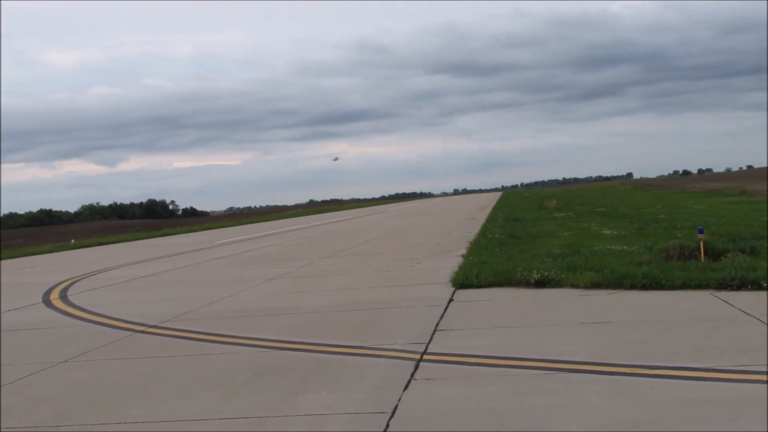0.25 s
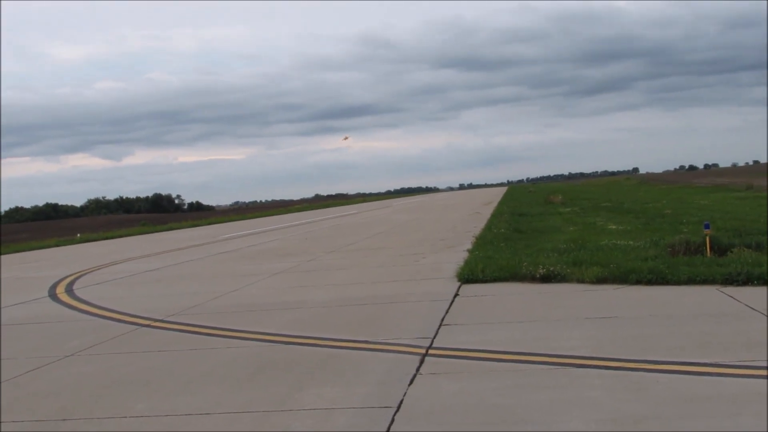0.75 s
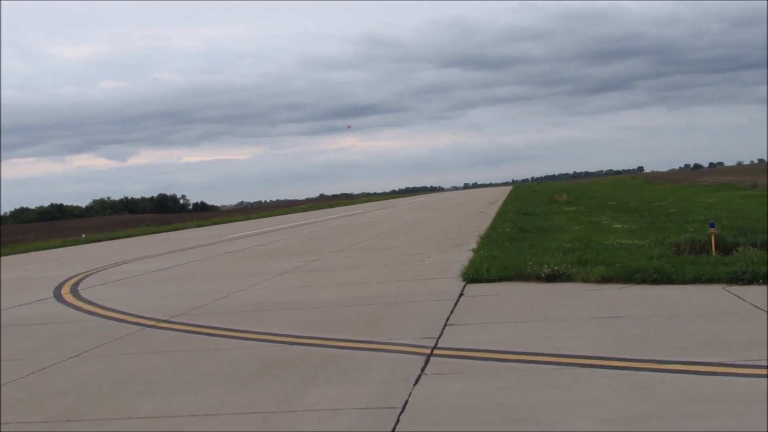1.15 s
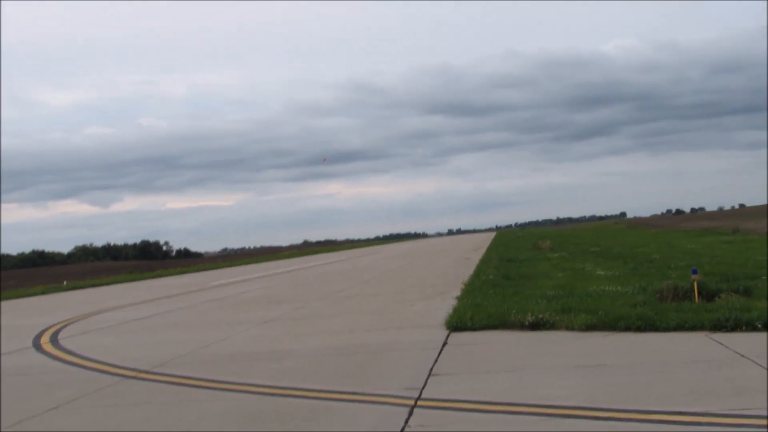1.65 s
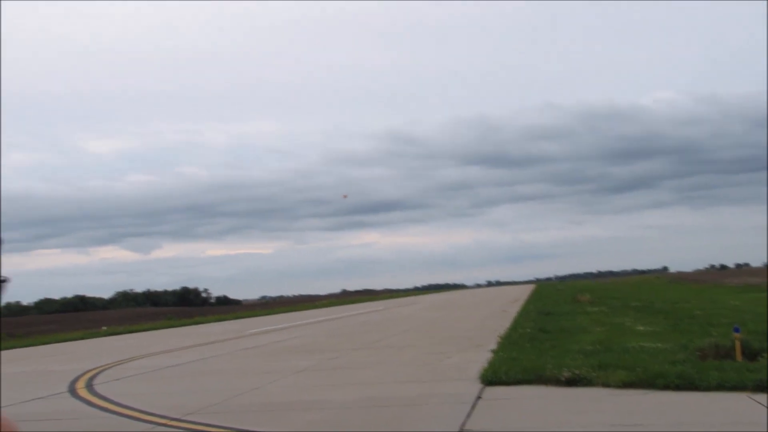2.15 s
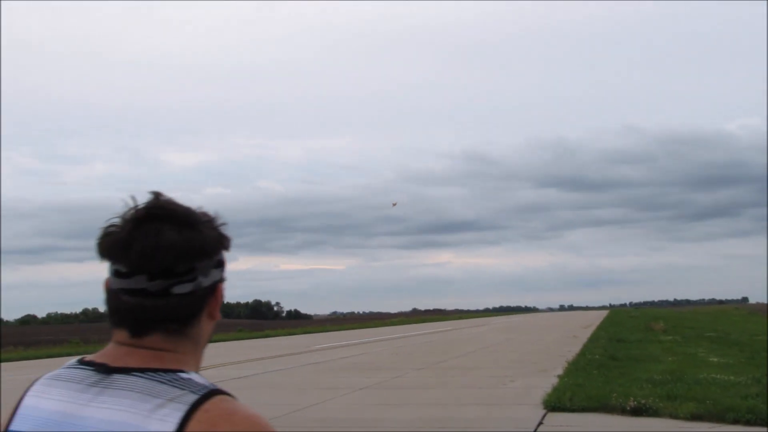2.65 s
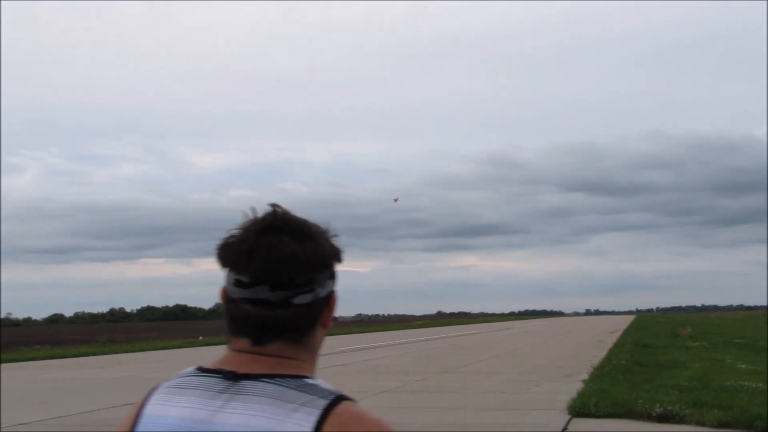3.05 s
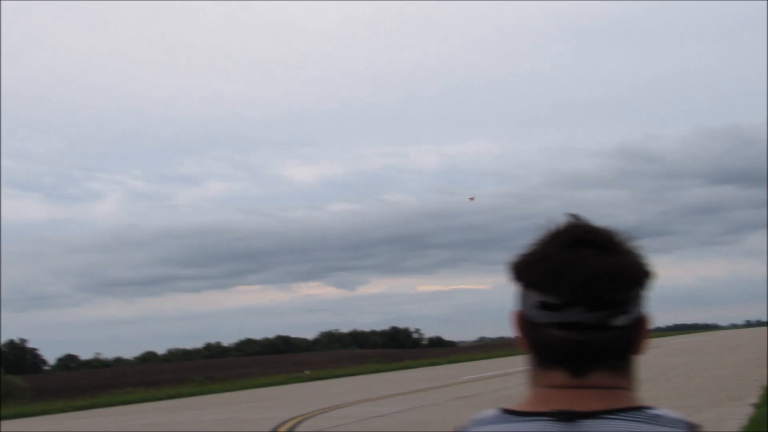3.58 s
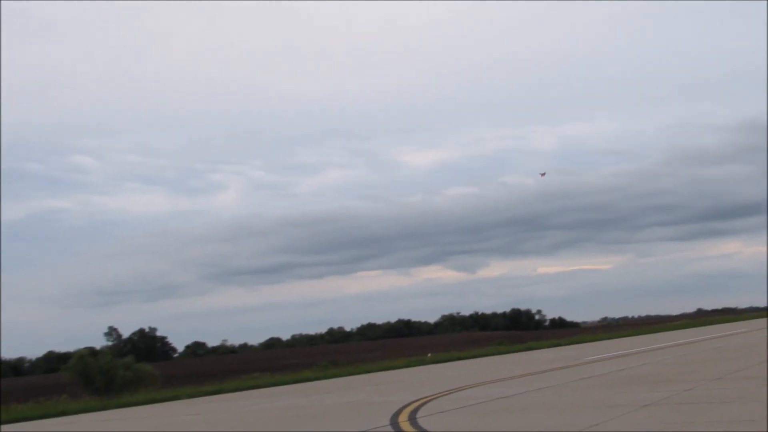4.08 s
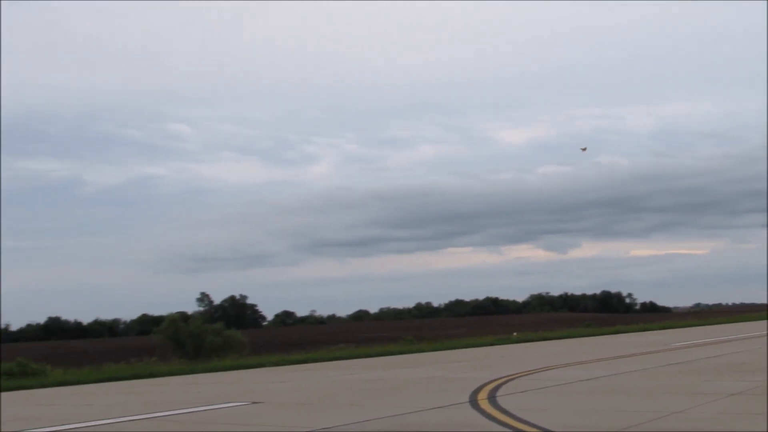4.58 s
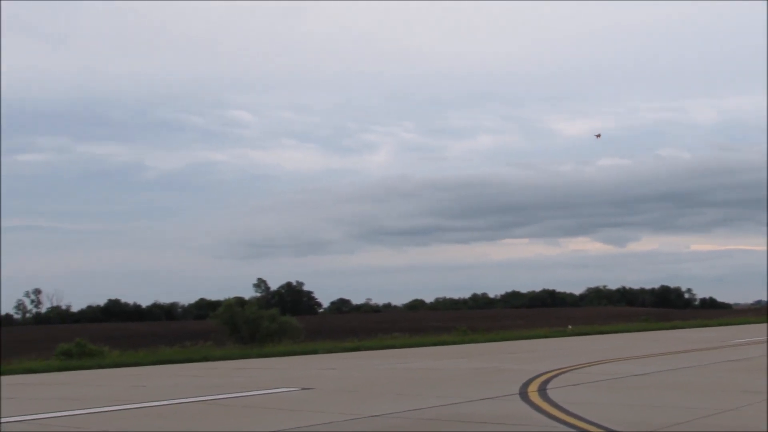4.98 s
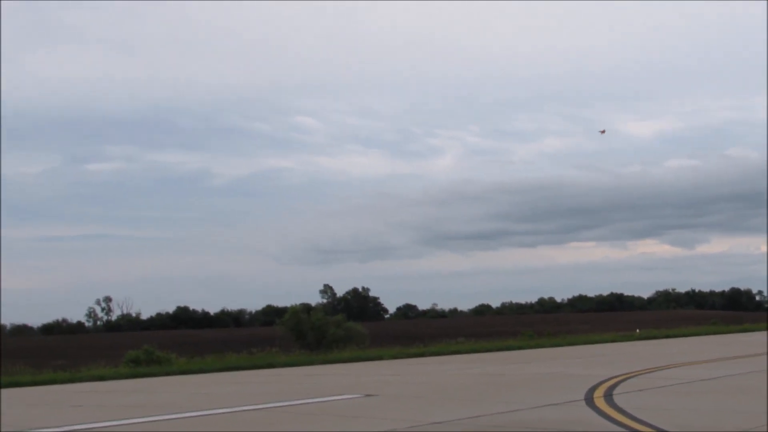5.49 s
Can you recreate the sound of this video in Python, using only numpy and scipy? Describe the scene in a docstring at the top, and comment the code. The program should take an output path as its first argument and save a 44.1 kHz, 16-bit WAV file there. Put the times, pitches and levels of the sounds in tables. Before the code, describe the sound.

Outdoors on an open airfield, wind hits an unprotected stereo microphone from the start, making low rumble and irregular thuds that push left and right opposite ways. Beneath it a small model jet gives a steady, central, breathy roar, brightest in the first half second, with a barely audible, very high whine that drops slightly around 0.4 s and fades by about 3 s. Thumps crowd together from 0.5 to 0.8 s and hit hardest at 1.2-1.7 s, with the sound briefly ducking. Wind eases around 1.8-2.8 s, exposing the roar, hollow and shifting as the jet climbs. Tiny cloth and sole brushes pass at 2.3-3.1 s. Heavy buffets return at 3.4-4.4 s, then crackling, snapping gusts at 4.8-5.1 s, with a soft scuff near 4.9 s. The roar swells and dips in uneven waves, losing its hiss, until a large thump at 5.6 s just before the end.

```python
"""Wind thuds on the microphones come first, over the roar of a model jet climbing from a runway by open fields.
Wind pushes the left and right ports opposite ways: small eddies make filtered noise, big ones thump and snap.
The roar is noise heard directly and off the ground, so notches drift down as it climbs; a thin sine whine falls.
Soles and cloth brush past as short bursts of noise. A limiter ducks everything when the hardest thumps overload."""
import sys
import numpy as np
from scipy import signal
from scipy.fft import rfft, irfft, next_fast_len
from scipy.io import wavfile
from scipy.ndimage import uniform_filter1d, minimum_filter1d

SR = 44100
rng = np.random.default_rng(int(sys.argv[2]) if len(sys.argv) > 2 else 0)


def log_audio(samples):
    """Write samples as a 16-bit WAV file to the path given in sys.argv[1]."""
    # one column per channel
    frames = np.atleast_2d(samples).T
    # limit to full scale, then quantise
    limited = np.clip(frames, -1, 1)
    pcm = np.round(limited * 32767).astype(np.int16)
    wavfile.write(sys.argv[1], SR, pcm)


N = 252693
T = np.arange(N) / SR
FRAME = 1024  # samples in each short spectrum
OPPOSITE = np.array([[1], [-1]])  # left and right pushed opposite ways

# Shoes and clothes brushing:
# (time [s], length either side [s], level [dB], centre [Hz], width either side [Hz])
BRUSHES = [(2.26, .004, -60, 10200, 4500), (2.438, .015, -66, 5700, 900), (2.454, 0.0065, -51, 5050, 500),
           (2.488, 0.064, -61, 7900, 4000), (2.681, 0.1, -60, 8500, 2400), (2.872, 0.03, -60, 7750, 750),
           (2.922, .07, -71, 10000, 4200), (2.924, .02, -56.5, 5200, 1300), (2.96, .015, -58.5, 5200, 1500),
           (3.035, .03, -59, 7750, 1100), (3.139, 0.12, -58.5, 7350, 3740), (3.85, .05, -73, 6000, 3500),
           (4.915, 0.075, -44, 2400, 1560), (4.938, 0.06, -53.5, 4600, 3400),
           (4.96, .03, -58.5, 6600, 3500), (5.426, 0.052, -62, 7160, 3200), (5.578, .027, -60, 6030, 3520)]
# Gusts at the ports, before small random surges:
# (start [s], holding time [s], level [dB], tilt toward small eddies [dB])
WIND_GUSTS = [(0, 0.013, -16.5, 2.5), (0.1, 0.12, -19.5, -2), (0.26, .05, -26, -6), (0.358, 0.053, -16, -2),
              (0.462, 0.079, -14, 3.5), (0.593, 0.048, -15.5, -2.5), (0.67, 0.084, -17.5, 0.5),
              (0.777, 0.18, -18, -2), (1.022, 0.039, -15.5, -2.5), (1.175, 0.06, -13, -1),
              (1.245, 0.19, -10.5, 2.5), (1.484, .05, -12.5, -0.5), (1.569, 0.046, -9, -3.5),
              (1.674, 0.03, -8, -2), (1.8, 0.038, -19.5, -6), (1.888, 0.042, -18.5, 0),
              (1.998, 0.052, -18.5, -9.5), (2.082, 0.12, -20, -2), (2.247, 0.039, -18, -1),
              (2.329, 0.066, -18.5, -0.5), (2.428, 0.13, -18, -3.5), (2.599, 0.032, -20, 4),
              (2.668, 0.024, -19.5, 0), (2.751, 0.033, -20, 0.5), (2.849, 0.01, -12.5, 1.5),
              (2.927, 0.018, -13.5, 1), (3.042, 0.031, -20, 2.5), (3.111, 0.023, -20, 2),
              (3.178, 0.022, -18.5, 1), (3.355, 0.013, -28, 5), (3.429, 0.076, -13.5, 1.5),
              (3.537, 0.069, -17, -5), (3.601, 0.041, -8.5, 0), (3.673, 0.14, -14, 0),
              (3.804, 0.12, -13, 3.5), (3.935, 0.18, -11.5, 2), (4.14, 0.06, -14, 1.5),
              (4.225, 0.1, -16.5, 1), (4.443, 0.028, -13.5, 4), (4.504, 0.087, -25.5, -4.5),
              (4.666, 0.017, -16, 0), (4.74, 0.065, -16.5, 0), (4.827, 0.056, -8.5, 9),
              (4.937, 0.063, -10.5, 8), (5.027, 0.068, -13.5, 4), (5.154, 0.08, -23, -6.5),
              (5.264, 0.068, -11.5, 4), (5.338, 0.024, -17, 3), (5.414, 0.026, -16, 6),
              (5.517, 0.044, -13, 5.5), (5.586, 0.028, -9, 1.5), (5.644, 0.095, -19.5, 2)]
# Wind rumble spectrum: (frequency [Hz], relative level per Hz [dB])
WIND_SPECTRUM = [(15, -9.5), (30, -28.5), (55, -2.5), (110, -0.5), (170, -1.5), (300, -8), (450, -17),
                 (560, -23), (690, -46), (850, -35), (1100, -52.5), (1600, -63), (3000, -100),
                 (12000, -110)]
# Big single eddies; the common and snap levels are trimmed in buffets():
# (time [s], peak [dB], pitch [Hz], spread [cycles], common part relative to the peak [dB],
#  snap level [dB], common share of the snap [0-1])
EDDY_THUMPS = [(.471, -4.5, 163, 0.4, -14, -48, .3), (0.494, -3.5, 80, .35, -16, -46, .2),
               (.509, -7, 113, 0.41, -14, -50, .3), (.534, 0.5, 312, 0.39, -13.5, -31, .2),
               (.588, -1.5, 163, 0.24, -16.5, -42, .3), (0.6, -8.5, 109, 0.47, -9, -50, .3),
               (.696, -3, 238, 0.33, -17.5, -38, .3), (0.713, -7.5, 150, 0.85, -14, -50, .3),
               (.813, -2, 216, 0.3, -19, -31, 0.5), (1.165, -3, 104, 0.21, -20, -50, .3),
               (1.205, -0.5, 123, 0.33, -15.5, -44, .25), (1.218, 0.5, 238, 0.33, -13, -36, .3),
               (1.241, 6, 214, 0.47, -15, -28, .4), (1.299, 0, 117, .4, -14.5, -50, .3),
               (1.318, 4.5, 216, 0.38, -13, -42, .3), (1.428, 0, 177, 0.47, -14.5, -48, .3),
               (1.581, -1, 147, 0.33, -21, -50, .3), (1.595, 0, 148, 0.39, -15, -50, .3),
               (1.612, -3, 288, 0.53, -13, -35, .3), (1.68, -3.5, 109, 0.27, -11.5, -50, .3),
               (1.698, -1, 226, 0.43, -12.5, -37, 0.3), (2.544, 0.5, 180, 0.25, -15.5, -30, .45),
               (2.762, -6.5, 159, 0.43, -17, -50, .3), (2.943, -4, 217, 0.28, -15, -38, .1),
               (3.041, -5, 124, 0.33, -14, -52, .3), (3.093, -2.5, 166, 0.39, -16.5, -48, .3),
               (3.451, -7, 135, 0.64, -15.5, -45, 0.2), (3.473, -4, 216, 0.42, -12.5, -36, .6),
               (3.486, -8.5, 164, 1.15, -10.5, -49.5, .3), (3.502, -6, 123, 0.38, -12.5, -50, .3),
               (3.617, -4, 216, 0.46, -12, -46, .3), (3.631, 1, 136, 0.38, -21, -50, .3),
               (3.643, 5.5, 261, 0.34, -16, -38, .3), (3.875, 5.5, 197, .7, -17.5, -30, .2),
               (3.937, 1, 178, 0.44, -19, -50, .3), (3.977, -2.5, 260, 0.27, -13.5, -26, 0.8),
               (4.071, -1, 134, 0.46, -14, -50, .3), (4.087, -3.5, 193, 0.34, -11, -50, 0.4),
               (4.232, -1.5, 308, 0.47, -15, -40, 0.3), (4.285, -1, 178, 0.42, -12.5, -53, .37),
               (4.352, 0, 227, 0.35, -13, -32, .5), (4.491, -4, 170, .35, -15.5, -50, .3),
               (4.676, -5, 84, 0.26, -16.5, -52, 0.4), (4.821, 3.5, 165, 0.52, -14, -21.5, 0.7),
               (4.958, 4.5, 220, 0.28, -16, -25.5, 0.4), (4.967, -1, 220, 0.3, -11, -44, .3),
               (5.066, 0.5, 238, 0.42, -16.5, -42, .3), (5.28, -1.5, 320, 0.36, -16, -47, .3),
               (5.307, -2, 300, 0.33, -16, -28, .6), (5.528, -5, 218, 0.61, -8.5, -27, 0.44),
               (5.536, -3.5, 164, .35, -13.5, -35, .3), (5.58, 6.5, 131, 0.35, -20, -20, 0.95),
               (5.613, 1.5, 164, 0.56, -16, -50, .3)]
# Compressor whine, fading with distance: (time [s], level [dB])
WHINE_LEVEL = [(0, -76), (.45, -72), (.75, -83), (1.25, -74), (1.85, -86), (2.9, -89), (3.3, -90),
               (4.4, -120)]
# The jet's loudness by band; the last three are relative to the roar, and bass is trimmed in exhaust():
# (time [s], roar [dB], bass [dB], rush [dB], hiss [dB])
JET_LEVELS = [(0, -37, -7.5, -7.5, -7.5), (.55, -37, -11.5, -8, -14), (.66, -40, -9, -7.5, -14.5),
              (.9, -41.5, -7.5, -7.5, -14), (1.17, -39.5, -7, -8.5, -12.5), (1.32, -42, -3, -13, -13),
              (1.55, -43.5, -3.5, -5.5, -11.5), (1.81, -46.5, -1, -10.5, -12),
              (2.31, -47.5, 0.5, -6.5, -10), (2.51, -43.5, -4, -5.5, -13), (2.71, -48, -3, -5, -10.5),
              (3.12, -43.5, -5, -8.5, -18.5), (3.32, -43, -3, -5.5, -19.5), (3.7, -37, -9, -12.5, -22),
              (3.82, -42, -7, -9, -14), (4.02, -44.5, -4, -8, -18.5), (4.22, -41.5, -10.5, -3, -15.5),
              (4.52, -40.5, -12.5, -4, -19), (4.72, -44, -10.5, -4.5, -24), (4.92, -37, -9, -10, -23.5),
              (5.03, -41, -14, -10, -19.5), (5.45, -39.5, -16.5, -8.5, -27.5),
              (5.73, -42.5, -15, -11.5, -27)]
# Exhaust noise spectrum: (frequency [Hz], relative level per Hz [dB])
EXHAUST_SPECTRUM = [(60, 4.5), (250, 7), (500, 4), (620, 1), (690, -13), (770, 1), (850, -2), (1050, 2),
                    (1270, 4.5), (1520, -2.5), (1740, 4), (2000, 1), (2450, -4), (3050, -2), (3480, -14),
                    (4100, -8), (4550, -13.5), (5600, -11), (9200, -15), (10800, -22), (11800, -31),
                    (13400, -39), (15000, -54)]
# The bounce off the ground: (time [s], lag [ms], strength before blurring [0-1])
GROUND_BOUNCE = [(0, 0.67, .3), (.45, 0.72, 0.4), (.75, 0.81, 0.75), (1.1, 0.923, 0.6), (1.5, 1.09, 0.22),
                 (1.9, 1.13, 0.44), (2.3, 1.2, 0.37), (2.5, 1.25, 0.37), (3.1, 1.304, 0.38),
                 (3.7, 1.45, 0.56), (4.1, 1.4, 0.37), (4.35, 1.37, 0.41), (4.68, 1.39, 0.57),
                 (4.85, 1.43, 0.55), (5.2, 1.51, 0.21), (5.73, 1.65, 0.16)]
# Ridges and hollows in the roar as the jet turns, before they waver:
# (start [s], end [s], from [Hz], to [Hz], width either side [Hz], height [dB])
ROAR_RIDGES = [(1.327, 2.4, 2650, 2300, 200, 4.5), (1.2, 1.86, 2340, 2500, 180, -12),
               (1.26, 2.33, 5300, 5800, 350, 4.5), (1.5, 2.68, 920, 910, 220, 5),
               (2, 3.3, 1620, 1510, 340, 6), (2.78, 3.65, 800, 730, 149, 6),
               (2.977, 4.23, 1320, 1400, 250, 5.5), (3.15, 3.5, 2070, 2100, 230, 2),
               (3.4, 3.95, 5300, 4300, 330, 5), (3.5, 4.77, 2230, 2280, 170, 7),
               (4.5, 4.96, 2080, 2030, 230, 7), (4.5, 5.8, 3500, 3520, 330, -6),
               (4, 4.95, 3300, 3040, 380, 7), (4, 4.67, 990, 1100, 260, -3),
               (5, 6.05, 2050, 1980, 410, 6.5), (-0.5, 0.19, 5550, 5400, 730, 4.5),
               (0, 0.36, 14000, 12000, 2600, 8), (1.6, 2.3, 1840, 1550, 260, -2),
               (1.9, 2.7, 4340, 4300, 310, -6.5)]
# The bands of bass, roar, rush and hiss: (from [Hz], to [Hz])
JET_BANDS = [(600, 950), (950, 2200), (2200, 3400), (4500, 10000)]


def undb(db):
    """Turn decibels into gain."""
    return 10 ** (np.asarray(db) / 20)


def curves(table, at=T):
    """Join each column of a table by straight lines in time."""
    s, *columns = np.transpose(table)
    return [np.interp(at, s, column) for column in columns]


def colour(points, hz):
    """Read a spectrum's level in dB at the given frequencies."""
    f, db = np.transpose(points)
    return np.interp(np.log(hz + 1), np.log(f), db)


def unit(x):
    """Scale to rms 1."""
    return x / np.sqrt(np.mean(x ** 2))


def filtered(x, points):
    """Pass a sound through a spectrum."""
    size = next_fast_len(N + 4096)
    hz = np.arange(size // 2 + 1) * SR / size
    return irfft(rfft(x, size) * undb(colour(points, hz)), size)[:N]


def walk(rate):
    """Wander between random levels, with rate new ones a second; rms 1."""
    hold = max(int(SR / rate), 2)
    steps = np.repeat(rng.standard_normal(N // hold + 1), hold)[:N]
    return unit(uniform_filter1d(steps, hold))


def noise_frames():
    """Cut white noise into short spectra: frequencies, times, frames."""
    f, t, z = signal.stft(rng.standard_normal(N), SR, nperseg=FRAME)
    return f[:, None], t, z


def from_frames(z):
    """Join short spectra into a sound."""
    return signal.istft(z, SR, nperseg=FRAME)[1][:N]


def scuffs(grain_db=2.5, side_db=-6):
    """Soles and cloth rub in short gritty brushes, each a swell of noise in one band."""
    out, grain = np.zeros((2, N)), grain_db * walk(320)
    for s, length, db, hz, width in BRUSHES:
        near = np.abs(T - s) < .3
        size = near.sum()
        band = np.exp(-2 * ((np.fft.rfftfreq(size, 1 / SR) - hz) / width) ** 2)
        noise = rng.standard_normal((2, SR))
        mid, side = unit(irfft(rfft(noise, size) * band, size))
        swell = np.exp(-2 * ((T[near] - s) / length) ** 2) * undb(db + grain[near])
        out[:, near] += swell * (mid + undb(side_db) * side * OPPOSITE)
    return out


def gusts(attack_s=0.0086, release_s=0.018, breeze_db=-30, breeze_tilt_db=-8):
    """Gusts rise, hold and die away over a steady breeze; gives the wind's level and tilt in dB."""
    power = np.full(N, undb(breeze_db) ** 2)
    tilted = power * breeze_tilt_db
    for start, length, db, tilt in WIND_GUSTS:
        rise = np.maximum(start - T, 0) / attack_s
        fall = np.maximum(T - start - length, 0) / release_s
        gust = (undb(db) * np.exp(-rise - fall)) ** 2
        power, tilted = power + gust, tilted + gust * tilt
    # the stronger a gust, the more its tilt counts
    return 10 * np.log10(power), tilted / power


def turbulence(db, tilt, flicker_db, lift_db, tilt_scale=0.99, crackle_db=3.5, follow_db=3):
    """Eddies press on a port: stronger wind brings more small ones, and the smallest come in bursts."""
    flicker = 1.95 * np.tanh(walk(55) / 1.62)
    noise = filtered(rng.standard_normal(N), WIND_SPECTRUM)
    # split the rumble from the largest, slowest eddies to the smallest
    lows = [signal.sosfiltfilt(signal.butter(3, hz, fs=SR, output="sos"), noise) for hz in (110, 280, 680)]
    deep, body, flap, crackle = np.diff([0 * noise, *lows, noise], axis=0)
    burst_db = crackle_db * 1.5 * np.tanh(walk(100) / 1.4) + follow_db * flicker
    burst = undb(burst_db + tilt + 0.87 * (db - db.max()))
    deep = deep * undb(-tilt_scale * tilt)
    flap = flap * undb(lift_db + tilt_scale * tilt + 3.3 * flicker)
    air = deep + body + flap + crackle * unit(burst)
    # even out the loudness, so that the wind level alone shapes it
    air = air / np.sqrt(uniform_filter1d(air ** 2, int(0.0295 * SR)) + 1e-18)
    return unit(air * undb(flicker_db * flicker)) * undb(db)


def buffets(common_db=0.0, snap_db=-0.5, snap_attack_s=0.00061, snap_release_s=0.0047):
    """Each big eddy gives a brief swing of pressure with a papery snap."""
    out = np.zeros((2, N))
    snap_spectrum = [(500, 3.0), (850, -1.0), (1250, -8.5), (2000, -30), (5000, -43), (12000, -79)]
    snap = unit(filtered(rng.standard_normal(N), snap_spectrum))
    chances = rng.random((len(EDDY_THUMPS), 2))
    for (s, push, hz, cycles, common, snap_level, share), (lead, sign) in zip(EDDY_THUMPS, chances):
        near = np.abs(T - s) < .04
        since = T[near] - s
        age = since * hz  # in cycles
        swell = np.exp(-.5 * (age / cycles) ** 2)
        # either port may be the one pushed in
        swing = np.sign(sign - .5) * undb(push) * swell * np.cos(2 * np.pi * age)
        out[:, near] += swing * OPPOSITE
        out[:, near] += undb(push + common + common_db) * swell * np.sin(2 * np.pi * age + lead)
        crack = np.exp(-.5 * (since / np.where(since < 0, snap_attack_s, snap_release_s)) ** 2)
        out[:, near] += undb(snap_level + snap_db) * crack * snap[near] * (share + OPPOSITE)
    return out


def wind(push_db=0.5, common_db=-13.5, surge_db=0.9, lean=0.062):
    """Close ports turn wind into opposite swings left and right, with a small common part."""
    level, tilt = gusts()
    level = level + surge_db * walk(23)
    push = turbulence(level + push_db, tilt, flicker_db=1.0, lift_db=-1.5)
    common = turbulence(level + common_db, tilt, flicker_db=2.0, lift_db=1.5)
    # the right port swings slightly harder
    ports = push * np.array([[1 - lean], [-1 - lean]]) + common
    # a big eddy briefly displaces the small ones
    for s, _, hz, *_ in EDDY_THUMPS:
        near = np.abs(T - s) < .04
        ports[:, near] *= 1 - np.exp(-((T[near] - s) * hz) ** 2)
    return ports + buffets()


def whine(near_hz=15060, away_hz=13700, drop_at_s=.38, drop_s=.12, waver_hz=35, near_waver_hz=50):
    """The compressor's blade tone sinks as the jet speeds away, roughened by the air."""
    away = .5 + .5 * np.tanh(.5 * (T - drop_at_s) / drop_s)
    waver = (waver_hz + near_waver_hz * (1 - away)) * walk(220)
    hz = near_hz + (away_hz - near_hz) * away + waver
    phase = 2 * np.pi * np.cumsum(hz) / SR
    rough_db = 3 * walk(14) + 2.5 * walk(300)
    return unit(np.sin(phase) * undb(rough_db)) * undb(curves(WHINE_LEVEL)[0])


def ridges(f, t, fade_s=0.22, wander_share=.09, flutter_share=.15):
    """As the jet turns, ridges and hollows in its roar glide, waver and fade; gives gain in dB."""
    out = 0
    for start, end, from_hz, to_hz, width, db in ROAR_RIDGES:
        wander, flutter = np.interp(t, T, walk(16)), np.interp(t, T, walk(24))
        # pitch wavers by a share of the width, height by a share of its dB
        hz = np.interp(t, [start, end], [from_hz, to_hz]) + wander_share * width * wander
        swell = np.clip(.5 + np.minimum(t - start, end - t) / fade_s, 0, 1)
        swell = swell * (1 + flutter_share * flutter)
        out = out + db * swell * np.exp(-2 * ((f - hz) / width) ** 2)
    return out


def shimmer(shape):
    """Moving air makes neighbouring frequencies fade and swell in patches; gives gain in dB."""
    patches = rng.standard_normal(shape)
    for _ in range(2):
        patches = uniform_filter1d(patches, size=2, axis=0)  # across frequency
        patches = uniform_filter1d(patches, size=9, axis=1)  # across time
    return 2 * unit(patches)


def exhaust(absorb_db=2.5, bass_db=0.5, twinkle_db=1.0):
    """Turbulent jet noise is combed by the ground bounce and dulled by distance."""
    f, t, z = noise_frames()
    roar_db, bass, rush, hiss = curves(JET_LEVELS, t)
    lag_ms, strength = curves(GROUND_BOUNCE, t)
    # rough ground and moving air blur the upper notches
    echo = strength * np.exp(-(f / 9000) ** 2)
    comb = 1 + echo ** 2 + 2 * echo * np.cos(2 * np.pi * f * lag_ms / 1000)
    # air takes absorb_db more each second at 10 kHz
    air_db = -absorb_db * t * (f / 10000) ** 2
    gain = undb(colour(EXHAUST_SPECTRUM, f) + ridges(f, t) + air_db) * np.sqrt(comb)
    # each band swells on its own as the nozzle turns; the hiss also twinkles
    hiss = hiss + twinkle_db * np.interp(t, T, walk(18))
    levels = []
    for (lo, hi), db in zip(JET_BANDS, [bass + bass_db, 0, rush, hiss]):
        band_power = np.mean(gain ** 2 * ((f > lo) & (f < hi)), axis=0)
        levels.append(roar_db + db - 10 * np.log10(band_power))
    # step from each band's level to the next midway between them
    swell_db = levels[0]
    for (_, below), (above, _), step in zip(JET_BANDS, JET_BANDS[1:], np.diff(levels, axis=0)):
        swell_db = swell_db + step / (1 + (np.sqrt(below * above) / (f + 1)) ** 20)
    return from_frames(z * gain * undb(swell_db + shimmer(z.shape)))


def jet(flutter_db=0.36, spread_db=2):
    """The exhaust flutters in the moving air; both ports hear it nearly alike."""
    mid = exhaust() * undb(flutter_db * walk(22.13))
    side_spectrum = [(200, 2), (800, -16.5), (2000, -23.0), (4000, -23.5), (8000, -15.5), (13000, -13)]
    side = filtered(exhaust(), side_spectrum)
    return mid + undb(spread_db) * side * OPPOSITE


def scene():
    """Add the passer-by, wind, whine and jet, with a very short fade at each end."""
    fade = np.minimum(np.minimum(T, T[-1] - T) / .004, 1)
    return (scuffs() + wind() + whine() + jet()) * fade


def record(dry, recovery_db_per_s=7, top_hz=15400):
    """The camera's limiter ducks for peaks over full scale and slowly recovers; the top is cut."""
    over_db = 20 * np.log10(np.maximum(np.abs(dry).max(axis=0), 1))
    recovery_db = recovery_db_per_s * T
    duck_db = np.maximum.accumulate(over_db + recovery_db) - recovery_db
    # start just ahead of each peak and round the corners, so that nothing clicks
    gain_db = uniform_filter1d(minimum_filter1d(-duck_db, size=513), size=513)
    top_cut = signal.ellip(8, .2, 70, top_hz, fs=SR, output="sos")
    return signal.sosfilt(top_cut, dry * undb(gain_db))


dry = scene()
out = record(dry)
log_audio(out)
```